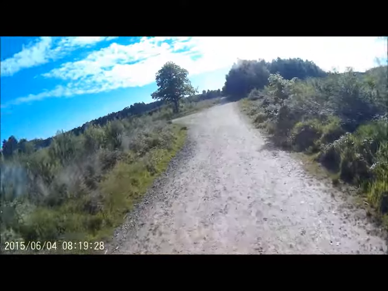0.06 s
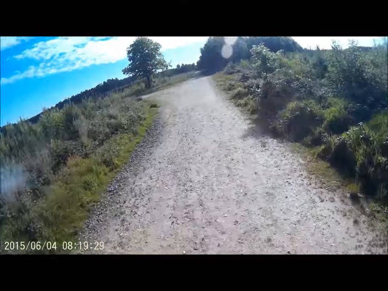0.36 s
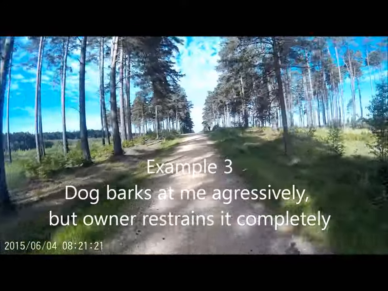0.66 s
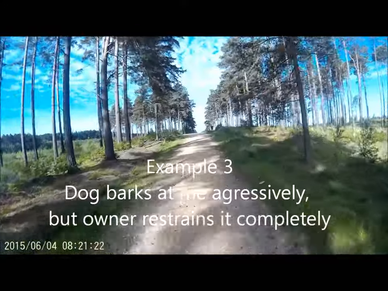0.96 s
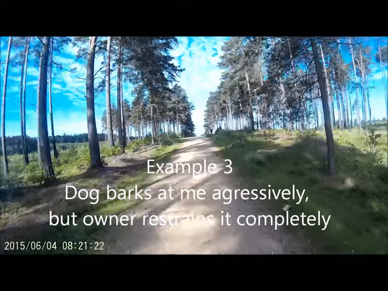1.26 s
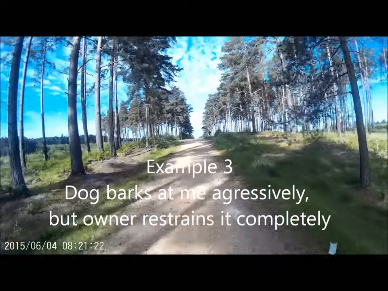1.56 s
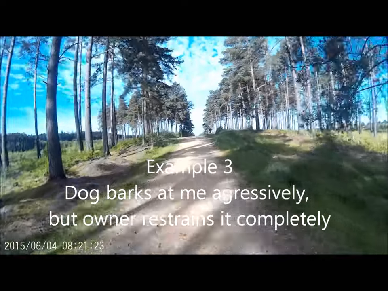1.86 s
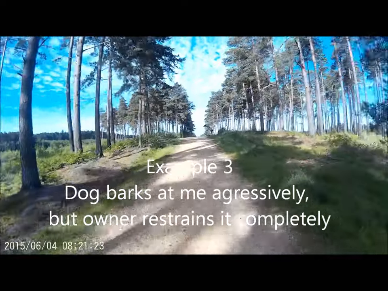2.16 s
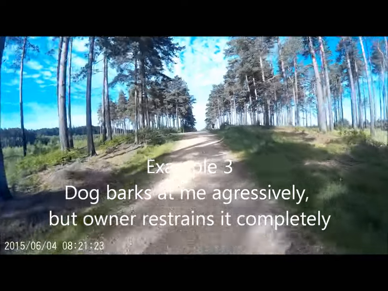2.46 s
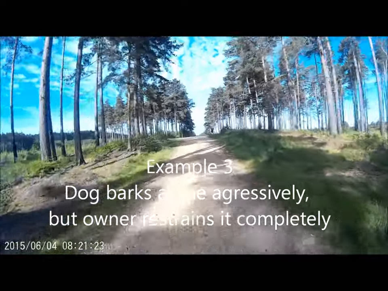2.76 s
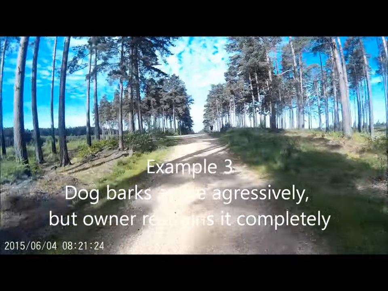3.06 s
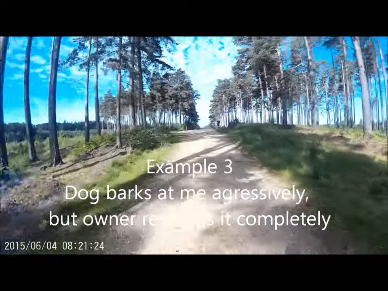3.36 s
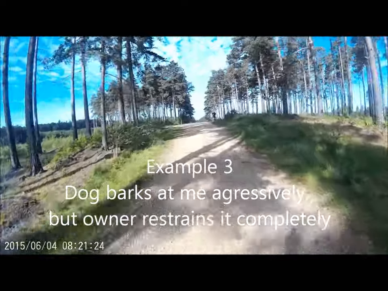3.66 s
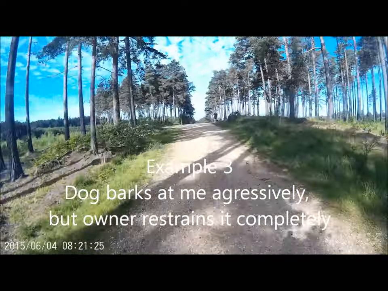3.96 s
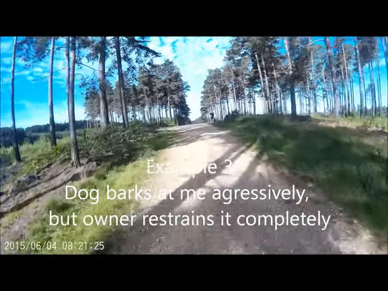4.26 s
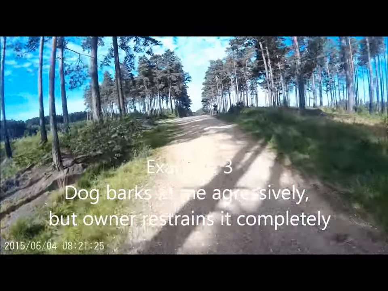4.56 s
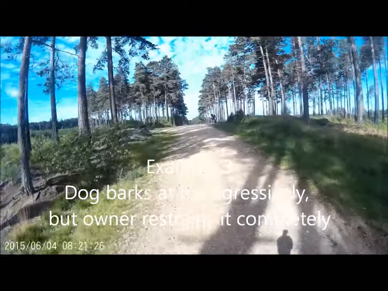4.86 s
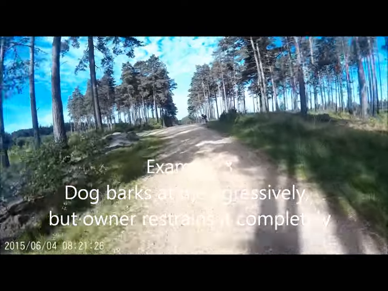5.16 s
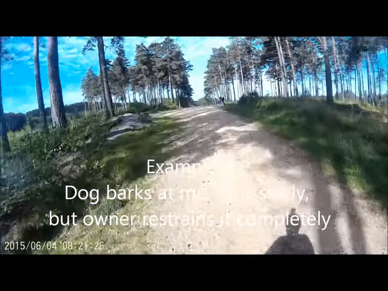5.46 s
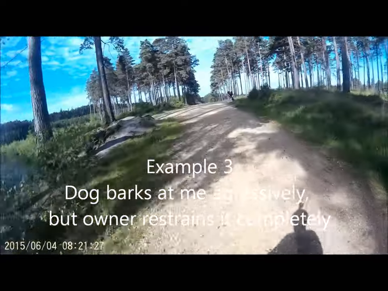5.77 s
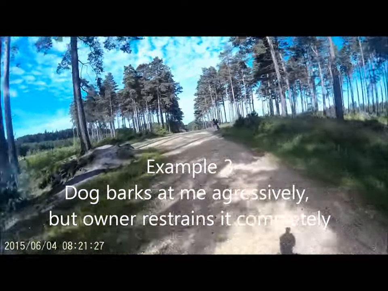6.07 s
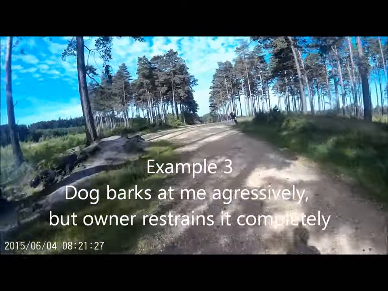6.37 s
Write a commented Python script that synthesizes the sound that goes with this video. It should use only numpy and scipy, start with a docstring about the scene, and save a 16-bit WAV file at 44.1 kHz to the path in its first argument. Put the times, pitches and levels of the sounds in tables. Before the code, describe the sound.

A loose plastic case rattles and clicks up close as a bicycle rolls over gravel, with soft tyre crunch and low wind rumble.

```python
"""A dry, close rattle of ticks, taps, snaps and hollow rubs: a bicycle on a gravel track in pine woods.
The microphone is in a small camera on the handlebar, inside a loose plastic case that the stones shake.
Bigger bumps thump up through the frame. From below, the tyres drone and crunch; wind rumbles on
the case itself, and far behind it all the camera's electronics hiss with a thin whine."""
import sys
import numpy as np
from scipy import signal
from scipy.fft import rfft, irfft
from scipy.io import wavfile
from scipy.ndimage import uniform_filter1d

SR = 44100
rng = np.random.default_rng(int(sys.argv[2]) if len(sys.argv) > 2 else 0)


def waveform_to_disk(signal):
    """Save audio, clipped to [-1, 1], as 16-bit WAV at the path in sys.argv[1]."""
    frames = np.transpose(np.atleast_2d(signal))
    scaled = np.clip(frames, -1, 1) * 32767
    samples = np.round(scaled).astype(np.int16)
    wavfile.write(sys.argv[1], SR, samples)


N = 282368
TIME = np.arange(N) / SR


# The case wall, right beside the microphone. Each row: start in seconds, strength in dB.
WALL_TICKS = [(0.2355, 2.5), (0.5123, 0.5), (0.816, 4.5), (0.8833, 0.5), (1.0217, -1.5), (1.12, 0.5),
              (1.3072, 2), (1.5701, -3.5), (1.7775, -0.5), (1.945, -0.5), (2.282, 0.5), (2.4428, 4),
              (2.6308, 4), (2.7103, 3), (2.8964, -1), (3.249, 3.5), (3.3359, 1), (3.4392, 1), (3.5124, 6.5),
              (3.5165, 1), (3.6381, 5), (3.7111, 7), (3.8447, -1), (4.2229, 6.5), (4.9729, 3.5), (5.063, 1),
              (5.3891, 0.5), (5.6088, -1.5), (5.6929, 0), (6.22, -2)]
# The wall's ring, then its crack. Each row: frequency in Hz, width in Hz, relative level in dB.
WALL_MODES = [(708, 277, -8), (1330, 227, -4.5), (1770, 346, -1.5), (3645, 293, 0), (4253, 310, 1.5),
              (5200, 320, -8), (5670, 430, -7.5), (6600, 620, -15.5), (7220, 290, -10.5), (8240, 520, -15),
              (9360, 590, -16.5), (10600, 190, -31), (12000, 170, -39)]
CRACK_MODES = [(11500, 850, -28)]
def wall_ticks():
    """The loose case ticks with its wall; the high crack grows faster than the tick's strength."""
    hits = harder_when_strong(WALL_TICKS, hardness_db=-0.08, per_db=0.39)
    ticks = knocks(hits, WALL_MODES, WALL_MODES, level_db=-1.5, rebound_db=-7.5, livelier=0.52,
                   gap_s=0.0017, loss_db=2.5, softening=4.96, count=4)
    start_s, db = np.transpose(WALL_TICKS)
    cracks = strike(np.round(start_s * SR).astype(int), 1 + 1.8 * db, 0, CRACK_MODES, spread_db=3.5)
    return lowpass(ticks, top_hz=12300) + cracks


# The case's foot on its mount. Each row: start in seconds, strength in dB, hardness in dB per octave.
FOOT_TAPS = [(0.2196, -6.5, -2.5), (0.4724, -3.5, 1.5), (0.6232, -6.5, -2), (0.793, -9, 7),
             (0.9228, -2.5, 0), (1.109, -.5, -0.5), (1.2243, -3, 3), (1.2754, -9, -1), (1.3806, -10, -2.5),
             (1.4465, -6, -2), (1.7056, -3, -.5), (1.7418, -5, 3), (1.767, -6, -3.5), (1.8544, -5, -1),
             (1.933, -1, -1.5), (2.046, -3, -0.5), (2.1021, -12.5, -3.5), (2.1874, -6, -1), (2.2298, 0, 4),
             (2.2655, -1.5, -2), (2.3965, 3, -1.5), (2.4133, -3.5, 6.5), (2.4344, 1.5, -1),
             (2.4773, -9, -3), (2.603, -0.5, -1), (2.6234, 0, 4.5), (2.6659, 3, 0), (2.6964, -2.5, -1.5),
             (2.8753, -6, -0.5), (3.219, -12, -4.5), (3.237, -5.5, -1), (3.4864, -1.5, -0.5),
             (3.6013, 1, -1), (3.6093, -7, 2), (3.6327, 5, -1), (3.682, -2, 4), (3.7012, 4, -1.5),
             (3.8771, -11, -4), (3.902, -12, -1.5), (3.983, -14, 3), (4.0832, -5.5, -2), (4.2286, -1, -.5),
             (4.3105, 1.5, -2), (4.3366, -6, -3), (4.4301, -8.5, -4.5), (4.4591, -9.5, -1.5),
             (5.1239, -9, 1.5), (5.1723, -10, -3), (5.2995, -6, 2.5), (5.3266, -12.5, -5), (5.551, -12, 0),
             (5.5813, -7, 0), (5.9954, -4.5, -2), (6.1951, -7, 0), (6.3857, -6, -2)]
# The case struck at its foot. Each row: frequency in Hz, width in Hz, relative level in dB.
FOOT_MODES = [(470, 600, -12), (1390, 600, -2.5), (1810, 314, 4), (2330, 590, -1), (2770, 1200, -3),
              (3740, 530, -2), (4120, 300, -6.5), (5400, 700, -10.5), (6920, 250, -17), (7700, 460, -18),
              (9020, 500, -18.5), (9900, 430, -24), (12000, 1300, -25.5)]
def foot_taps():
    """The foot taps now flat, now on its edge; the plastic yields, taking off the highest treble."""
    taps = knocks(FOOT_TAPS, FOOT_MODES, FOOT_MODES, level_db=-0.13, rebound_db=-14.5, livelier=0.14,
                  gap_s=0.0024, loss_db=2.5, softening=3.7, count=3)
    return lowpass(taps, top_hz=11000)


# The latch, heard from inside the case. Each row: start in seconds, strength in dB.
LATCH_SNAPS = [(0.1278, -2), (0.426, -6.5), (0.6, -3.5), (0.704, -6), (0.786, -1.5), (0.8602, -3.5),
               (0.913, 1), (1.08, -1.5), (1.216, -5), (1.37, 0.5), (1.6387, -2.5), (1.7342, -2),
               (1.822, -7), (1.9044, -3), (2.0044, -3.5), (2.158, -2), (2.4038, 0.5), (2.595, -1.5),
               (2.656, 3.5), (2.8496, -2), (2.9604, -3.5), (3.204, -5.5), (3.2854, -0.5), (3.4047, -3.5),
               (3.4745, 0.5), (3.5964, 0), (3.6751, 4), (3.7669, -3.5), (3.9775, -7), (4.1883, -5),
               (4.2688, 5), (4.4025, -4.5), (4.892, -10), (5.13, -11), (5.5344, -5.5), (5.9684, -11),
               (6.3456, -14)]
# The case struck at its latch. Each row: frequency in Hz, width in Hz, relative level in dB.
LATCH_MODES = [(671, 81, 1), (1460, 550, -9.5), (1960, 150, 3.5), (2770, 200, -4), (3320, 280, -0.5),
               (4340, 210, 1), (5040, 123, -1.5), (6070, 76, -2), (7090, 375, 3), (7520, 800, 2),
               (8485, 590, -8), (10730, 140, -7.5), (11560, 370, -14), (12900, 400, -30)]
def latch_snaps():
    """A snap of the latch throws the case back onto its foot."""
    hits = harder_when_strong(LATCH_SNAPS, hardness_db=0, per_db=0.2014)
    snaps = knocks(hits, LATCH_MODES, FOOT_MODES, level_db=-0.22, rebound_db=-0.9, livelier=0.37,
                   gap_s=0.0014, loss_db=1.6, softening=-0.76, count=6)
    return lowpass(snaps, top_hz=13600)


def harder_when_strong(hits, hardness_db, per_db):
    """Give each hit a hardness, in dB per octave, that rises with its strength."""
    return [(s, db, hardness_db + per_db * db) for s, db in hits]


def knocks(hits, modes, rebound_modes, level_db, rebound_db, livelier, gap_s, loss_db, softening, count):
    """A double contact, then uneven rebounds; a strong knock rebounds more (livelier, dB per dB)."""
    start_s, db, hardness = np.transpose(hits)
    at = np.round(start_s * SR).astype(int)
    lags_s = np.cumsum(gap_s * rng.uniform(0.45, 1.6, (len(at), count)), axis=1)
    shares_db = 2 * rng.standard_normal(lags_s.shape) - loss_db * np.arange(count)
    shares_db -= 10 * np.log10(np.sum(from_db(shares_db) ** 2, axis=1, keepdims=True))  # one energy
    bounce_at = (at[:, None] + (lags_s * SR).astype(int)).ravel()
    bounce_db = ((db + livelier * db + rebound_db)[:, None] + shares_db).ravel()
    bounce_hardness = np.repeat(hardness, count) - softening
    chatter = strike(bounce_at, bounce_db, bounce_hardness, rebound_modes, spread_db=3.5)
    # A knock is never quite square: a second corner lands a moment later and colours it.
    corner_s, corner_db = 0.00055, -8.5
    corner_at = at + (corner_s * SR * rng.uniform(0.4, 1.6, len(at))).astype(int)
    contact_db = np.r_[db, db + corner_db] + level_db
    contact = strike(np.r_[at, corner_at], contact_db, np.r_[hardness, hardness], modes, spread_db=0.8)
    return contact + chatter


def strike(at, level_db, hardness, modes, spread_db):
    """Contacts at the given samples ring a set of modes; hard ones favour the high modes."""
    chance_db = spread_db * rng.standard_normal((len(at), len(modes)))
    out = np.zeros(N)
    for k, (hz, width_hz, db) in enumerate(modes):
        tilt_db = hardness * np.log2(hz / 3000)
        force = np.bincount(at, from_db(level_db + db + tilt_db + chance_db[:, k]), N)[:N]
        out += (-1) ** k * resonate(force, hz, width_hz)
    return out


def foot_jiggle(ground_db, level_db, hardness_db, count):
    """The foot also touches very lightly at random, more firmly on rough ground."""
    at = by_chance(ground_db, count)
    touch_db = level_db + 0.5 * (ground_db[at] - ground_db.mean())
    return strike(at, touch_db, hardness_db, FOOT_MODES, spread_db=4)


# Hollow rubs, close to the microphone. Each row: middle in seconds, relative level in dB.
RUBS = [(0.586, -35), (1.299, -42), (1.561, -34), (1.732, -35), (2.225, -31.5), (2.388, -36.5),
        (2.563, -38.5), (2.748, -34.5), (4.185, -33.5), (4.286, -30.5), (4.398, -39), (4.541, -40.5),
        (5.338, -43.5), (5.752, -47), (5.815, -46)]
def case_rubs(ground_db, level_db, faint_db, thud_db, thud_hz, thud_width_hz):
    """The case slides briefly and sets its mount humming with a soft thud; faint rubs come at random."""
    friction = through_mount(rng.standard_normal(N), top_hz=2180)
    friction /= np.sqrt(uniform_filter1d(friction ** 2, size=200) + 1e-9)  # even out the level
    events = RUBS + [(s, faint_db) for s in by_chance(0.5 * ground_db, count=18) / SR]
    hum = resonate(rng.standard_normal(N), thud_hz, thud_width_hz)
    hum = rms_one(resonate(hum, thud_hz, thud_width_hz))
    rubs = from_db(level_db) * swells(events, width_s=0.0041) * friction
    thuds = from_db(thud_db) * swells(events, width_s=0.0084) * hum
    return rubs + thuds


# Low resonances of mount and shell. Each row: frequency in Hz, width in Hz, relative level in dB.
MOUNT_MODES = [(620, 140, -9), (1265, 167, -1), (1540, 180, 3), (1860, 390, -2)]
def through_mount(force, top_hz):
    """Vibration reaches the case through the mount, which rings hollow and passes no treble; rms 1."""
    rings = sum((-1) ** k * from_db(db) * resonate(force, hz, width_hz)
                for k, (hz, width_hz, db) in enumerate(MOUNT_MODES))
    return rms_one(lowpass(rings, top_hz, order=8))


# Bumps, reaching the microphone through the frame. Each row: time in seconds, relative level in dB.
BUMPS = [(0.24, -31), (0.813, -38), (0.883, -37), (2.232, -35), (2.276, -35), (2.425, -35.5), (2.633, -31),
         (2.748, -37), (3.523, -30.5), (3.645, -25.5), (3.72, -30), (4.233, -33.5), (4.521, -40.5)]
def bumps(swing_hz, width_s, delay_s, level_db):
    """A bump swings the mount down and back up, with a slight overshoot."""
    out = np.zeros(N)
    for s, db in BUMPS:
        t = TIME - s - delay_s
        out += from_db(db + level_db) * np.sin(2 * np.pi * swing_hz * t) * bell_curve(t, width_s)
    return out


# The gravel track passing under the wheels. Each row: time in seconds, roughness as a level in dB.
ROUGHNESS = [(0.0, -56.5), (0.23, -65.5), (0.46, -65), (0.64, -53.5), (1.69, -57), (1.85, -54.5),
             (2.37, -56), (2.74, -53.5), (2.97, -61.5), (3.24, -59.5), (3.44, -54.5), (3.65, -52),
             (4.06, -62), (4.4, -54.5), (4.67, -61.5), (5.79, -61), (5.93, -61), (6.4, -61.5)]
def track_roughness():
    """How rough the ground is at every sample, in dB."""
    return np.interp(TIME, *np.transpose(ROUGHNESS))


def frame_shake():
    """The whole bicycle shakes for a moment around each knock; the swells add up in power."""
    knock_s, db = np.transpose([row[:2] for row in WALL_TICKS + FOOT_TAPS + LATCH_SNAPS])
    coarse = TIME[::100]
    power = from_db(db) ** 2 @ bell_curve(coarse - knock_s[:, None], width_s=0.029)
    return np.interp(TIME, coarse, np.sqrt(power))


# Fine grit, down at the tyres. Each row: frequency in Hz, relative spectral level in dB.
GRIT_SPECTRUM = [(500, -8), (1500, -5), (2300, -6.5), (3200, -9.5), (4300, -15), (6000, -16.5),
                 (12000, -20), (16000, -35)]
def gravel_crunch(ground_db, shake, stones_per_s, size_spread_db, clump_db, bed_db, grit_db):
    """Stones grind under the tyres in clumps, more of them on rough ground; fine grit hisses along."""
    crunch = np.hypot(from_db(ground_db - 1.8), from_db(-63) * shake)
    crunch_db = 20 * np.log10(crunch)
    clumps_db = clump_db * drift(60)
    rate = stones_per_s * from_db(0.5 * (crunch_db - crunch_db.mean()))
    struck = rng.random(N) < rate / SR
    sizes = from_db(size_spread_db * np.minimum(rng.exponential(1, N), 3))
    stones = rms_one(struck * sizes * rng.choice([-1, 1], N))
    grind = (stones + from_db(bed_db) * rng.standard_normal(N)) * from_db(clumps_db)
    grit = from_db(grit_db + 0.5 * clumps_db) * noise(GRIT_SPECTRUM)
    return crunch * (through_mount(grind, top_hz=2190) + grit)


# The tyres, heard from the handlebar. Each row: frequency in Hz, relative spectral level in dB.
DRONE_SPECTRUM = [(60, -12), (110, 1), (160, -1.5), (225, 3), (290, -2.5), (400, -5), (650, -12),
                  (950, -12), (1500, -28), (3000, -51)]
def tyre_drone(ground_db, shake, level_db, follows, shake_db):
    """The rolling drone follows a share of the roughness and lifts when the bicycle shakes."""
    rolling = from_db(level_db + follows * (ground_db - ground_db.mean()))
    return np.hypot(rolling, from_db(shake_db) * shake) * noise(DRONE_SPECTRUM)


# Wind right on the microphone's case. Each row: time in seconds, relative level in dB.
GUSTS = [(0.0, -43.5), (0.4, -50.5), (0.7, -45), (2.1, -47.5), (2.6, -42.5), (3.15, -49), (3.6, -40),
         (4.1, -52.5), (4.55, -48), (4.8, -55), (6.4, -53)]
# Its rumble. Each row: frequency in Hz, relative spectral level in dB.
WIND_SPECTRUM = [(12, -2), (22, 7.5), (45, -4), (68, -3), (95, -20), (140, -26), (300, -51)]
def wind(level_db):
    """Air buffets the case with a deep rumble that rises and falls."""
    gust_db = np.interp(TIME, *np.transpose(GUSTS))
    return from_db(gust_db + level_db) * noise(WIND_SPECTRUM)


def high_ticking(level_db, ticks_per_s, first_s, swell_s):
    """A faint sizzle swells three times, a second apart: perhaps the chain as the pedals turn."""
    swell = sum(bell_curve(TIME - first_s - turn, swell_s) for turn in range(3))
    ticks = np.cos(np.pi * ticks_per_s * TIME) ** 2
    sizzle = rms_one(resonate(rng.standard_normal(N), hz=11600, width_hz=1200))
    return from_db(level_db) * swell * ticks * sizzle


# The camera's own hiss. Each row: frequency in Hz, relative spectral level in dB.
HISS_SPECTRUM = [(500, 12), (3000, 5.5), (6000, 0.5), (11000, 0.5), (15000, -1.5), (17000, -33)]
# Its whine. Each row: frequency in Hz, relative level in dB.
WHINE_TONES = [(9490, -77), (9561, -88.5)]
def electronics(hiss_db, whine_db, waver_hz):
    """The electronics add an even hiss and two close, slightly wavering high tones."""
    whine = sum(from_db(db) * np.sqrt(2) * np.sin(wavering_phase(hz, waver_hz, per_s=30.8))
                for hz, db in WHINE_TONES)
    return from_db(hiss_db) * noise(HISS_SPECTRUM) + from_db(whine_db) * whine


# Peeps, barely reaching the microphone. Each row: middle in seconds, pitch in Hz, level in dB,
# level of the octave in dB above that.
PEEPS = [(2.9, 6560, -72, 1), (4.87, 6720, -71, 2)]
def peeps(width_s, waver_hz):
    """Thin, short, unsteady tones with their octave."""
    out = np.zeros(N)
    for s, hz, db, octave_db in PEEPS:
        phase = wavering_phase(hz, waver_hz, per_s=300)
        swell = from_db(db) * bell_curve(TIME - s, width_s)
        out += swell * (np.sin(phase) + from_db(octave_db) * np.sin(2 * phase))
    return out


def from_db(db):
    """Decibels to gain."""
    return 10 ** (np.asarray(db) / 20)


def rms_one(x):
    """Scale to an rms of 1."""
    return x / np.sqrt(np.mean(x ** 2) + 1e-20)


def noise(spectrum):
    """White noise through a minimum-phase filter with the given spectrum; rms 1."""
    hz, db = np.transpose(spectrum)
    bins_hz = np.maximum(np.arange(N // 2 + 1) * SR / N, 1)
    gain = from_db(np.interp(np.log(bins_hz), np.log(hz), db))
    cepstrum = irfft(np.log(gain), N)
    cepstrum[1:N // 2] *= 2
    cepstrum[N // 2 + 1:] = 0
    return rms_one(irfft(rfft(rng.standard_normal(N)) * np.exp(rfft(cepstrum)), N))


def drift(per_s):
    """A line wandering through per_s random values a second; rms 1."""
    return rms_one(np.interp(TIME * per_s, np.arange(N), rng.standard_normal(N)))


def wavering_phase(hz, waver_hz, per_s):
    """Phase of a tone whose pitch drifts at random."""
    return 2 * np.pi * np.cumsum(hz + waver_hz * drift(per_s)) / SR


def by_chance(ground_db, count):
    """Random samples, more of them where the ground is rough."""
    odds = np.cumsum(from_db(ground_db))
    return np.searchsorted(odds / odds[-1], rng.random(count))


def bell_curve(t, width_s):
    """A smooth rise and fall, 1 at t = 0."""
    return np.exp(-np.minimum((t / width_s) ** 2, 50))


def swells(events, width_s):
    """A short rise and fall for each pair of time in seconds and level in dB."""
    coarse = TIME[::10]
    return np.interp(TIME, coarse, sum(from_db(db) * bell_curve(coarse - s, width_s) for s, db in events))


def resonate(x, hz, width_hz):
    """One resonance with a gain of 1 at its top."""
    r = np.exp(-np.pi * width_hz / SR)
    feedback = [1, -2 * r * np.cos(2 * np.pi * hz / SR), r * r]
    return signal.lfilter(np.array([1, 0, -1]) * (1 - r * r) / 2, feedback, x + 1e-18)


def lowpass(x, top_hz, order=2):
    """Roll off the treble above top_hz."""
    return signal.sosfilt(signal.butter(order, top_hz, fs=SR, output="sos"), x)


def scene():
    """One microphone on the handlebar: rattle, rubs and bumps up close, over tyres and wind."""
    ground_db = track_roughness()
    shake = frame_shake()
    mix = wall_ticks() + foot_taps() + latch_snaps()
    mix += foot_jiggle(ground_db, level_db=-19.5, hardness_db=-2.5, count=30)
    mix += case_rubs(ground_db, level_db=-1.5, faint_db=-51.5, thud_db=-15, thud_hz=231, thud_width_hz=94)
    mix += bumps(swing_hz=43, width_s=0.012, delay_s=0.011, level_db=1.5)
    mix += gravel_crunch(ground_db, shake, stones_per_s=870, size_spread_db=6, clump_db=2,
                         bed_db=2.5, grit_db=-6)
    mix += tyre_drone(ground_db, shake, level_db=-56.5, follows=0.65, shake_db=-58.5)
    mix += wind(level_db=0.5)
    mix += high_ticking(level_db=-64, ticks_per_s=60, first_s=0.84, swell_s=0.091)
    mix += electronics(hiss_db=-64, whine_db=1, waver_hz=2.5)
    mix += peeps(width_s=0.039, waver_hz=80)
    return mix[None]


def record(dry):
    """The top is cut steeply above 15.8 kHz."""
    return signal.sosfilt(signal.ellip(10, 0.1, 80, 15800, fs=SR, output="sos"), dry)


dry = scene()
out = record(dry)
waveform_to_disk(out)
```